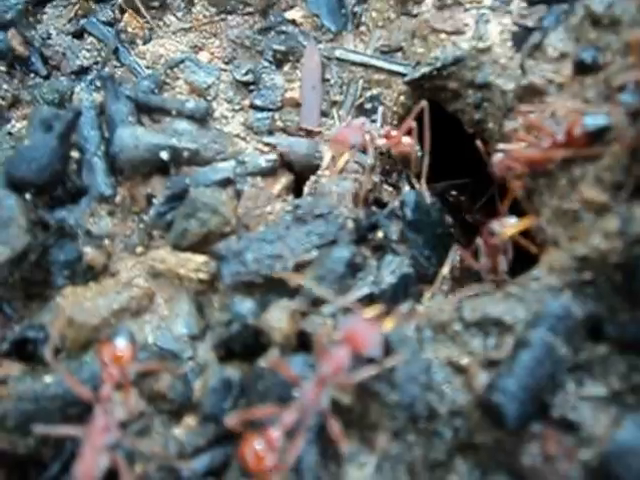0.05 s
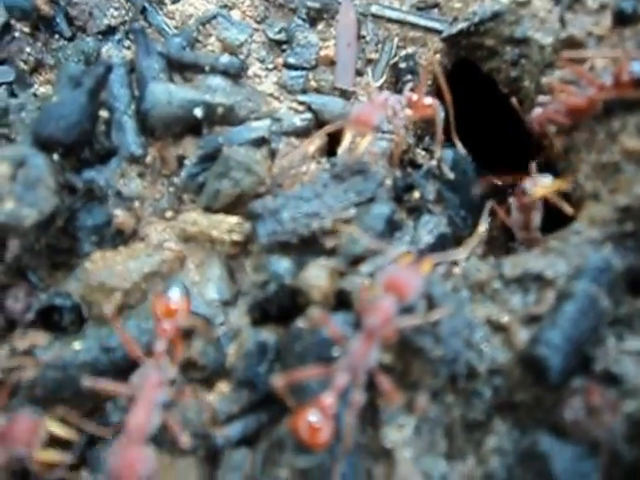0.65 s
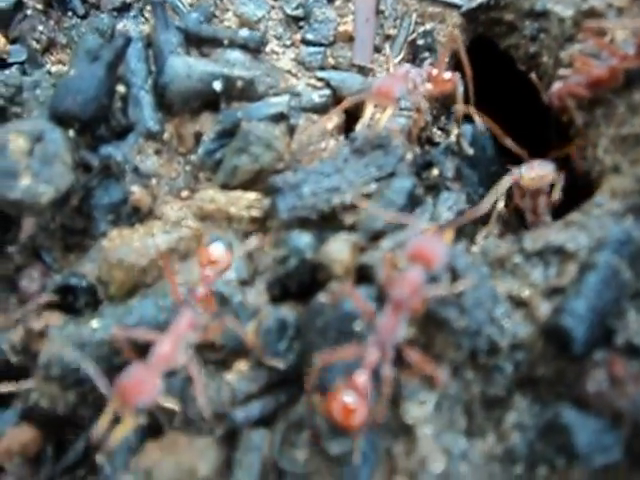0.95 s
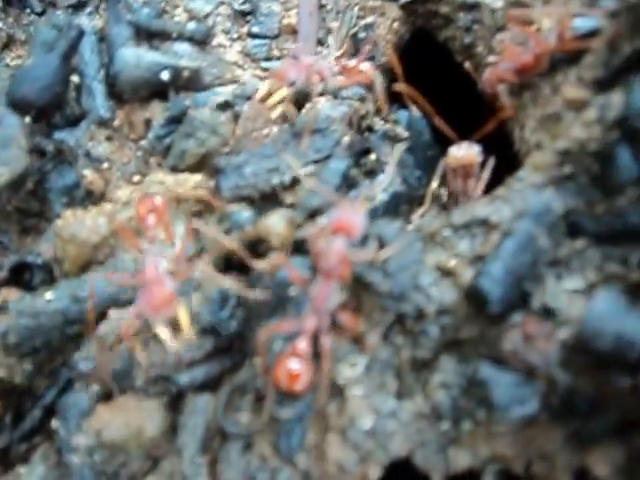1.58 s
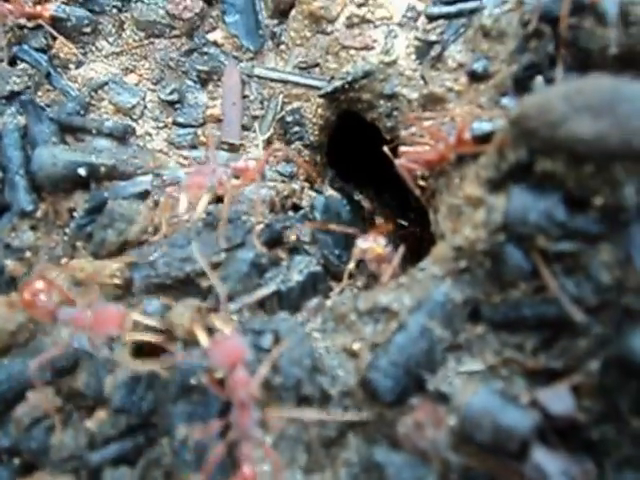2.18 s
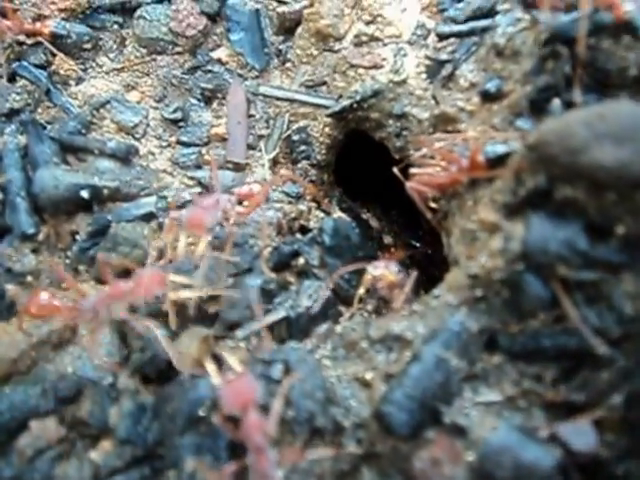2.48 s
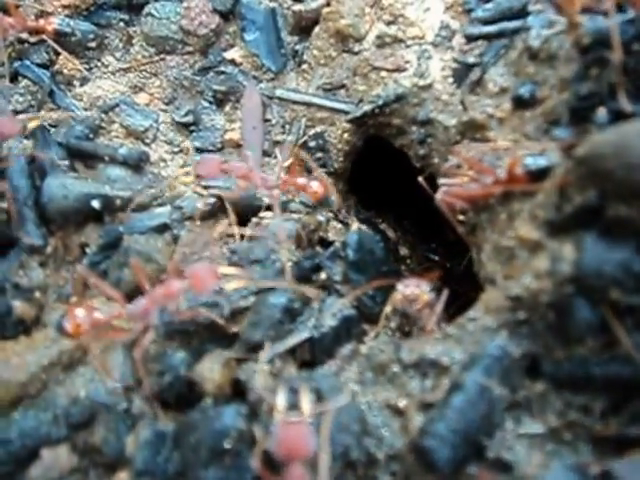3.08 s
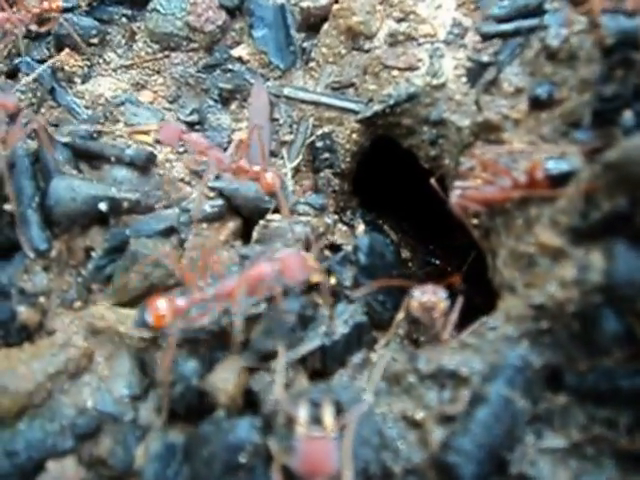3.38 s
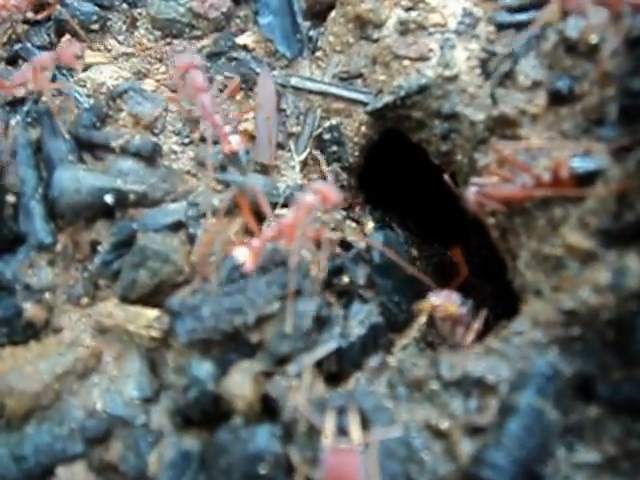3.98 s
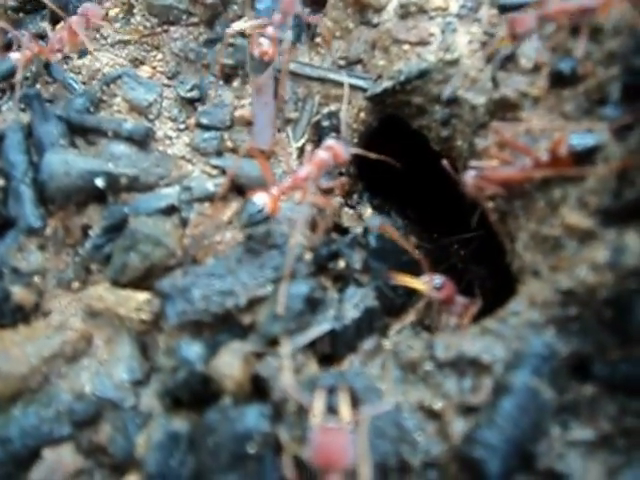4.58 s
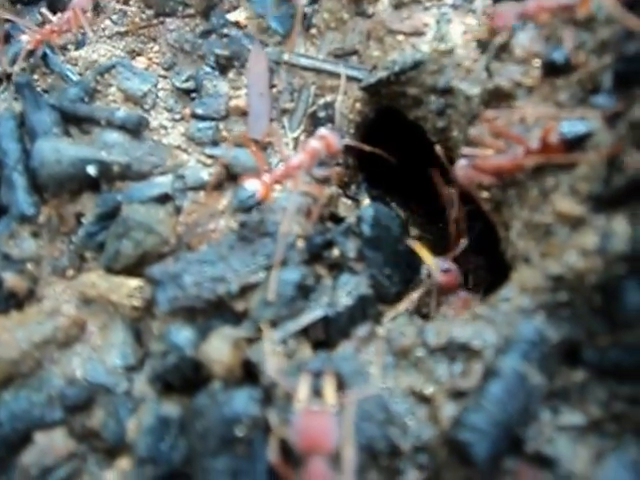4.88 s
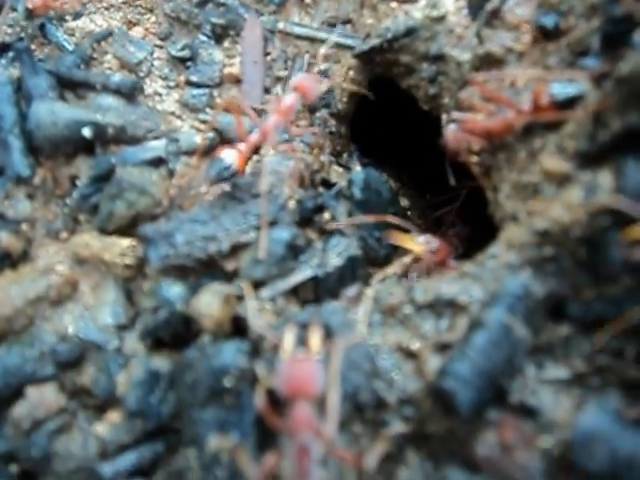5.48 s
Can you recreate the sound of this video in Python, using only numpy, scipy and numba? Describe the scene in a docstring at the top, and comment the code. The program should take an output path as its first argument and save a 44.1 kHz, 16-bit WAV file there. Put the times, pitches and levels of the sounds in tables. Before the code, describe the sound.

A distant chorus of cicadas buzzes steadily outdoors over a faint rumble of air. After about two seconds a nearby cicada starts up, its high, rasping buzz coming in quick pulses and growing into a loud, full song. A lower, quieter insect joins with rough, whistled pulses. The near cicada stays loud to the end, with a slight outdoor echo, through a microphone that loses the highest treble.

```python
"""A distant cicada chorus buzzes over faint outdoor air while a neighbour ticks softly.
From 1.8 s a near cicada winds up to full song: syllables of tymbal clicks ring its hollow abdomen.
From 2.8 s a lower insect pulses near 2 kHz. Trunks and leaves scatter these two voices.
All of it reaches one narrow-band microphone."""
import sys
import numpy as np
from scipy import signal
from scipy.fft import rfft, irfft
from scipy.io import wavfile
from scipy.ndimage import uniform_filter1d
from numba import njit

SR = 44100
rng = np.random.default_rng(int(sys.argv[2]) if len(sys.argv) > 2 else 0)


def inscribe(sig):
    """Save sig as 16-bit PCM at rate SR to the path in sys.argv[1].

    A 1-D sig is mono; a 2-D sig holds one channel per row.
    Samples are clipped to [-1, 1] before scaling.
    """
    pcm = np.round(np.clip(np.atleast_2d(sig).T, -1, 1) * 32767)
    wavfile.write(sys.argv[1], SR, pcm.astype(np.int16))


N = 249165
TIME = np.arange(N) / SR

# abdomen tension: t/s, tension (0 slack, 1 tight)
ABDOMEN_TENSION = [(1.7, 0.029), (2.7, 0.11), (3.2, .27), (3.6, 0.55), (4.2, 0.67), (4.8, 0.86),
                   (5.2, 0.95), (5.6, 0.98)]
# abdomen resonances: slack f/Hz, tight f/Hz, width/Hz, slack gain/dB, tight gain/dB
ABDOMEN_MODES = [(2700, 2868, 126, -12, -4.5), (2950, 3043, 87, -8, -7.5), (3188, 3336, 140, -2, -17),
                 (3508, 3622, 58.5, 0.5, 2.5), (3802, 4050, 205, -2, -5), (3960, 4191, 125, 1, 0),
                 (4230, 4544, 220, -12, -6.5), (4580, 4766, 200, -17, -14.5), (5100, 5000, 180, -26.5, -15),
                 (6030, 6020, 180, -35, -25), (6500, 6500, 320, -31, -22), (6900, 6200, 150, -37.5, -30.5)]
# tymbal ribs in buckling order: t/s into the stroke, f/Hz
TYMBAL_RIBS = [(0, 4530), (.0012, 3784), (.0024, 2950)]
# syllables of each named rhythm: t/s into the phrase, stroke count
PHRASE_RHYTHMS = {"wind-up": [(0, 4), (.028, 4), (.052, 9)], "three": [(0, 6), (.035, 4), (.061, 6)],
                  "four": [(0, 4), (.03, 4), (.056, 6), (.086, 5)], "four, long last": [(0, 4), (.032, 4),
                  (.061, 4), (.085, 6)]}
# phrases after the wind-up: t/s, rhythm name
SONG_PHRASES = [(2.852, "four"), (2.982, "wind-up"), (3.096, "wind-up"), (3.21, "four"), (3.334, "wind-up"),
                (3.446, "three"), (3.565, "four"), (3.69, "three"), (3.802, "three"), (3.909, "four"),
                (4.035, "three"), (4.139, "four, long last"), (4.27, "three"), (4.375, "four"),
                (4.505, "three"), (4.611, "three"), (4.717, "four, long last"), (4.845, "three"),
                (4.947, "four, long last"), (5.078, "four, long last"), (5.203, "three"),
                (5.3, "four, long last"), (5.43, "four"), (5.551, "three")]
# click strength at phrase start: t/s, relative level/dB
PHRASE_LEVEL = [(1.75, -49.5), (2.1, -46.5), (2.8, -36.5), (3.12, -34.5), (3.4, -30), (3.9, -28.5),
                (4.7, -27.5), (5.6, -27.5)]
# lower insect's effort: t/s, f/Hz, relative level/dB
LOW_INSECT_EFFORT = [(2.88, 1987, -53), (3.6, 2026, -47.5), (4.2, 2046, -44.5), (4.9, 2076, -43.5),
                     (5.6, 2083, -43.5)]
# distant chorus spectrum: f/Hz, relative level/dB
CHORUS_SPECTRUM = [(1400, -25.5), (1850, -9.5), (2000, 2), (2150, -6.5), (2450, -3.5), (2780, 1),
                   (3250, -3), (3850, 1), (4400, -4.5), (4800, -11.5), (5250, -15.5), (5520, -29),
                   (5720, -19.5), (6900, -38.5)]
# outdoor air spectrum: f/Hz, relative level/dB
AIR_SPECTRUM = [(15, -4.5), (35, 0), (90, -1), (160, -0.5), (300, -2.5), (600, -6.5), (1000, -9.5),
                (1600, -12), (2500, -21), (6000, -46.5)]

STROKE_HZ = 249.3  # both tymbals together


def cicada(gain_db=24.5, rib_spread_hz=380, shut_db=-7):
    """Each rib rings lower than the last: strokes chirp down. Most modes rise as the abdomen tightens."""
    tension = curve(TIME, ABDOMEN_TENSION)
    lags_s, rib_hz = np.transpose(TYMBAL_RIBS)
    ribs = np.array([tymbal_rib(lag_s) for lag_s in lags_s])
    song = np.zeros(N)
    for k, (slack_hz, tight_hz, width_hz, slack_db, tight_db) in enumerate(ABDOMEN_MODES):
        share = 1 / (1 + ((tight_hz - rib_hz) / rib_spread_hz) ** 4)  # nearest rib in pitch drives most
        drive = share / np.linalg.norm(share) @ ribs
        mode_hz = (slack_hz + (tight_hz - slack_hz) * tension) * (1 + 0.0031 * wander(60))
        mode_db = slack_db + (tight_db - slack_db) * tension
        song += (-1) ** k * undb(mode_db) * resonate(drive, mode_hz, float(width_hz))
    # abdominal flaps close between syllables and muffle the ring
    flaps_open = np.zeros(N)
    for start_s, strokes, _ in syllables():
        end_s = start_s + (strokes + .5) / STROKE_HZ
        flaps_open[int(start_s * SR):int(end_s * SR)] = 1
    song *= undb(shut_db * (1 - uniform_filter1d(flaps_open, size=100)))
    # a small body radiates little bass
    song = colour(song, [(800, -41.5), (1800, -13), (2400, -4), (2700, 2.5), (4700, 1.5),
                         (5500, -9), (6000, -4.5), (7000, -7.5)])
    return unit(song) * rms(ribs) * undb(gain_db)


def tymbal_rib(lag_s, limp=0.039, jitter=.04, spread_db=1.0, crescendo_db=0.5):
    """One rib's clicks; left and right tymbals pull in turn, harder through each syllable."""
    times_s, sizes = [], []
    for start_s, strokes, level_db in syllables():
        k = np.arange(strokes)
        late, strength = rng.standard_normal((2, strokes))
        times_s.append(start_s + lag_s + (k + limp * (k % 2) + jitter * late) / STROKE_HZ)
        sizes.append(undb(level_db + spread_db * strength + crescendo_db * np.linspace(-.5, .5, strokes)))
    return clicks(np.concatenate(times_s), np.concatenate(sizes))


def syllables(first_s=1.779, period_s=.12, wind_ups=9, slack_rise_db_per_s=32):
    """Even wind-up phrases, then full song. Rows: t/s, stroke count, relative level/dB."""
    wind_up = [(first_s + k * period_s, "wind-up") for k in range(wind_ups)]
    rows = []
    for start_s, rhythm in wind_up + SONG_PHRASES:
        level_db = curve(start_s, PHRASE_LEVEL)
        slack = 1 - curve(start_s, ABDOMEN_TENSION)
        for lag_s, strokes in PHRASE_RHYTHMS[rhythm]:
            rows.append((start_s + lag_s, strokes, level_db + slack_rise_db_per_s * slack * lag_s))
    return rows


def low_insect(gain_db=0.5, half_length_s=0.052, glide_hz_per_s=900, roughness=0.3, echo_db=-8):
    """Rough whistled notes, almost joined, each sliding upward, blurred by the trees."""
    voice = np.zeros(N)
    waver_hz = 11 * wander(70)
    flutter = 1 + roughness * wander(170)
    for middle_s, pitch_hz, level_db in low_notes():
        near = np.abs(TIME - middle_s) < .11
        t = TIME[near] - middle_s
        phase = 2 * np.pi * np.cumsum(pitch_hz + glide_hz_per_s * t + waver_hz[near]) / SR
        swell = np.exp(-.5 * (t / half_length_s) ** 4)
        voice[near] += undb(level_db + gain_db) * swell * flutter[near] * np.sin(phase)
    return voice + undb(echo_db) * tree_echo(voice, t60_s=0.43, delay_s=0.0092)


def low_notes(first_s=2.88, period_s=.133, slowing_s=.0014, count=20):
    """Notes grow slower, higher, louder. Rows: middle t/s, f/Hz, relative level/dB."""
    k = np.arange(count)
    middles_s = first_s + k * period_s + slowing_s * k ** 2 / 2
    at_s, pitch_hz, level_db = np.transpose(LOW_INSECT_EFFORT)
    return zip(middles_s, np.interp(middles_s, at_s, pitch_hz), np.interp(middles_s, at_s, level_db))


def neighbour(level_db=-54.0, syllable_hz=26.4, stroke_s=0.0068, rib_lag_s=0.001402, spread_db=1.5):
    """A mid-distance cicada ticks: three strokes a syllable, two ribs a stroke."""
    syllable = np.arange(int(TIME[-1] * syllable_hz))[:, None]
    stroke = np.arange(3)
    late, strength = rng.standard_normal((2, len(syllable), len(stroke)))
    times_s = (syllable + .06 * late[:, :1]) / syllable_hz + stroke_s * (stroke + .15 * late)
    sizes = undb(spread_db * strength)
    upper = resonate(clicks(times_s, sizes), 4000 + 90 * wander(150), width_hz=190.0)
    lower = resonate(clicks(times_s + rib_lag_s, sizes), 3720 + 70 * wander(150), width_hz=150.0)
    ticks = colour(upper + lower, [(1000, -30), (3000, -1), (4300, -2.5), (5200, -17.5), (7000, -19.5)])
    return undb(level_db) * unit(ticks)


def chorus(base_db=-44.0, gap_scale_s=1 / 330, decay_s=0.0027, spread_db=1.0, wash=1.4):
    """Many far cicadas: overlapping tymbal bursts over their reverberant wash, slowly swelling."""
    gaps, strength = rng.standard_normal((N // 10, 2)).T
    times_s = np.cumsum(np.abs(gaps)) * gap_scale_s
    bursts = clicks(times_s, undb(spread_db * strength) ** 2)
    t = np.arange(SR // 20) / SR
    power = signal.fftconvolve(bursts, np.exp(-t / decay_s))[:N]
    envelope = np.sqrt(np.abs(power) / np.mean(power) + wash)
    buzz = colour(envelope * rng.standard_normal(N), CHORUS_SPECTRUM)
    swell_db = np.interp(TIME, [0, 1, 1.7, 2.4, 3.5, 5.6], [-0.8, -0.43, 1.2, 1.0, 2.5, 6.5])
    return unit(buzz) * undb(base_db + swell_db + 0.34 * wander(25))


def air(level_db=-53.5):
    """Soft, steady outdoor rumble."""
    rumble = colour(rng.standard_normal(N), AIR_SPECTRUM)
    return unit(rumble) * undb(level_db + 0.51 * wander(3.4))


def tree_echo(x, t60_s, delay_s):
    """Diffuse echo off trunks and leaves, at the rms of x."""
    t = np.arange(SR // 2) / SR
    tail = rng.standard_normal(len(t)) * np.exp(-np.log(1000) * t / t60_s) * (t > delay_s)
    return unit(signal.fftconvolve(x, tail)[:N]) * rms(x)


@njit
def resonate(x, centre_hz, width_hz):
    """State-variable band-pass, moving centre."""
    y = np.empty(len(x))
    band_state, low_state = 0., 0.
    for i in range(len(x)):
        g = np.tan(np.pi * centre_hz[i] / SR)
        damping = width_hz / centre_hz[i]
        band = (band_state + g * (x[i] - low_state)) / (1 + g * (g + damping))
        band_state = 2 * band - band_state
        low_state += 2 * g * band
        y[i] = damping * band
    return y


def clicks(times_s, sizes):
    """Impulses, each split between two adjacent samples."""
    position = np.clip(times_s.ravel() * SR, 0, N)
    index, fraction = position.astype(int), position % 1
    before = np.bincount(index, sizes.ravel() * (1 - fraction), N + 2)
    after = np.bincount(index + 1, sizes.ravel() * fraction, N + 2)
    return (before + after)[:N]


def colour(x, points):
    """Filter by points of f/Hz, gain/dB."""
    hz, db = np.transpose(points)
    bins_hz = np.maximum(np.fft.rfftfreq(N, 1 / SR), 1)
    return irfft(rfft(x) * undb(np.interp(np.log(bins_hz), np.log(hz), db)), N)


def wander(rate_hz):
    """Smooth random drift, rms 1."""
    hold = max(int(SR / rate_hz), 1)
    steps = np.repeat(rng.standard_normal(N // hold + 1), hold)
    return unit(uniform_filter1d(steps, hold)[:N])


def curve(t, points):
    return np.interp(t, *np.transpose(points))


def undb(db):
    return 10 ** (np.asarray(db) / 20)


def rms(x):
    return np.sqrt(np.mean(x ** 2))


def unit(x):
    return x / rms(x)


def scene(echo_db=-12):
    """Near cicada and its tree echo over the other insects and the air."""
    song = cicada()
    echo = undb(echo_db) * tree_echo(song, t60_s=0.67, delay_s=0.0067)
    return (song + echo + low_insect() + neighbour() + chorus() + air())[None]


def record(dry):
    """Narrow-band microphone: steep low-pass near 7 kHz."""
    cutoff_hz = 7030
    return signal.sosfilt(signal.ellip(10, .2, 80, cutoff_hz, fs=SR, output="sos"), dry)


dry = scene()
out = record(dry)
inscribe(out)
```